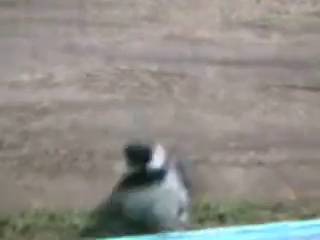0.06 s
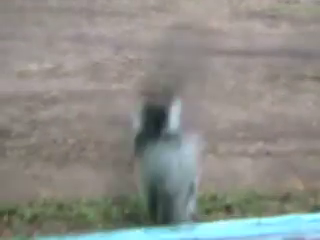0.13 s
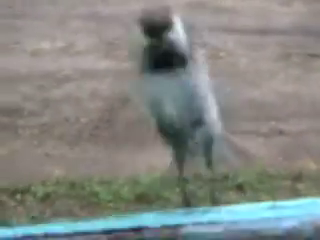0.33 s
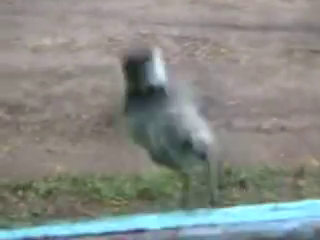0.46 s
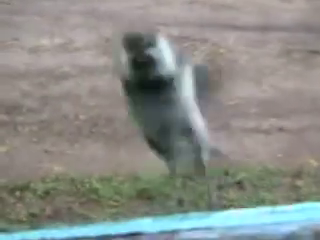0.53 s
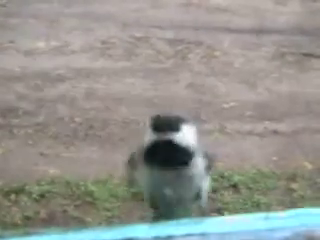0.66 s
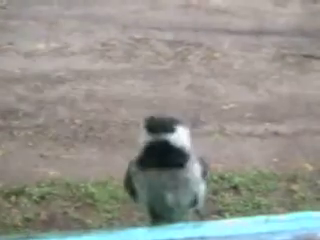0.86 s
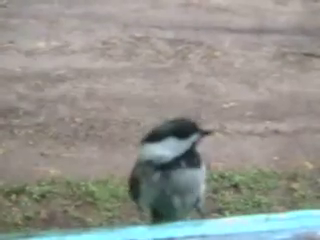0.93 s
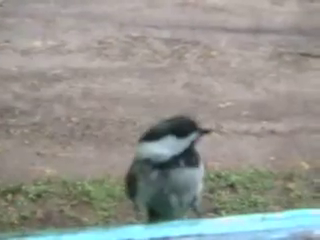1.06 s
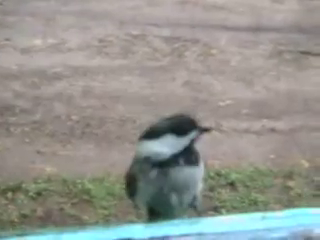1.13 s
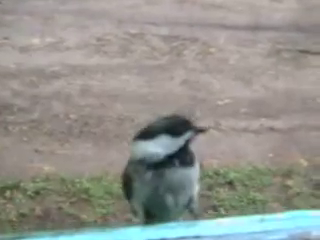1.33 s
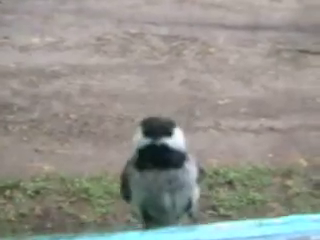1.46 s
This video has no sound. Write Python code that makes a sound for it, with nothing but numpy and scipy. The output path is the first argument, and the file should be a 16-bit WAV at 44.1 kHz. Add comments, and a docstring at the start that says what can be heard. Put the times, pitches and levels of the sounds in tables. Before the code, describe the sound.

Three hard, evenly spaced beak knocks on window glass, with faint claw clicks and soft ticking indoors

```python
"""A small bird strikes a window pane three times with its beak, heard from inside a quiet room.
Each blow is a short push into dying sines (knock and glass), a bright noise burst and a noise tail (room).
Claws click on the sill (noise and a dull thud), a clock ticks faintly (one small ring, repeated),
and far birds chirp (narrow noise), over shaped noise for the room's air and the building's murmur."""
import sys
import numpy as np
from scipy import signal
from scipy.fft import rfft, irfft
from scipy.io import wavfile
from scipy.ndimage import uniform_filter1d

SR = 44100
rng = np.random.default_rng(int(sys.argv[2]) if len(sys.argv) > 2 else 0)


def unload_audio(sound):
    """Save the sound as a 16-bit wav file, at the path given as the first command line argument."""
    columns = np.transpose(np.atleast_2d(sound))
    # keep every value between -1 and 1, then stretch to whole-number steps
    steps = np.round(np.clip(columns, -1, 1) * 32767)
    wavfile.write(sys.argv[1], SR, steps.astype(np.int16))


N = 66150  # 1.5 s


def amp(db):
    """Turn decibels into a plain factor."""
    return 10 ** (np.asarray(db) / 20)


def evened(x):
    """Scale a sound to an rms of 1."""
    return x / np.sqrt(np.mean(x ** 2) + 1e-20)


def read(points, hz):
    """Read a curve at the given pitches, along a logarithmic pitch scale."""
    f, value = np.transpose(points)
    return np.interp(np.log(hz + 1), np.log(f + 1), value)


def level_over_time(points):
    """Draw straight lines between (time, dB) points, one value per sample."""
    return np.interp(np.arange(N) / SR, *np.transpose(points))


def add(mix, s, sound):
    """Mix a sound in at s seconds, cutting off what runs past the end."""
    part = mix[round(s * SR):][:len(sound)]
    part += sound[:len(part)]


def ring(modes, seconds):
    """A struck object sounds as a sum of dying sines, here with a soft start."""
    rise_s = 0.00055
    t = np.arange(round(seconds * SR)) / SR
    tones = 0
    for hz, db, t60 in modes:
        tones = tones + amp(db - 60 * t / t60) * np.sin(2 * np.pi * hz * t)
    return tones * (1 - np.exp(-(t / rise_s) ** 2))


def band_noise(hz, width_hz, size):
    """Noise passed twice through one resonance of the given width, rms 1."""
    b, a = signal.iirpeak(hz, hz / width_hz, SR)
    once = signal.lfilter(b, a, rng.standard_normal(size))
    return evened(signal.lfilter(b, a, once))


def air():
    """Room tone: noise with a fixed colour whose patches of pitch drift in strength."""
    # colour of the room tone: f/Hz, level/dB per Hz
    colour = [(25, -27), (50, -13.5), (90, -7.5), (150, -4), (210, -4), (300, -10), (480, -11.5),
              (620, -4.5), (750, -13.5), (1200, -17.5), (2000, -23.5), (3000, -28.5), (4500, -35),
              (6000, -45.5), (7500, -53.5), (9000, -82)]
    # slow changes of its loudness: t/s, level/dB
    drift = [(0, 5), (.05, -1.5), (0.199, 1), (0.999, -1), (1.25, -2), (1.5, -0.5)]
    base_db = -62.5
    frames, hz = N // 512 + 5, np.fft.rfftfreq(2048, 1 / SR)
    a, b, patches = rng.standard_normal((frames, 1025, 3)).T
    # smooth across pitch, then across time
    patches = evened(uniform_filter1d(uniform_filter1d(patches, 16, 0), 5, 1))
    spectrum = (a + 1j * b) * amp(read(colour, hz)[:, None] + 1.5 * patches)
    noise = signal.istft(spectrum, nperseg=2048, noverlap=1536)[1][:N]
    return amp(base_db + level_over_time(drift)) * evened(noise)


def rumble():
    """Low murmur of the building: narrow low noise, swelling slowly."""
    # loudness of the murmur: t/s, level/dB
    swell = [(0, -78.5), (.9, -73.5), (1.149, -77), (1.33, -70), (1.5, -75)]
    return amp(level_over_time(swell)) * band_noise(37, 25, N)


def far_birds():
    """Blurred short chirps: narrow noise swelling and fading around one pitch."""
    # chirps: t/s, length/s, f/Hz, level/dB
    chirps = [(1.399, .024, 4300, -71), (1.425, .075, 4300, -78), (1.443, 0.021, 4030, -74),
              (1.485, 0.018, 4080, -72)]
    width_hz = 750
    out = np.zeros(N)
    for s, length, hz, db in chirps:
        size = round(length * SR)
        # keep the end of the noise, where the resonance has settled
        noise = band_noise(hz, width_hz, 5000)[-size:]
        add(out, s, amp(db) * np.hanning(size) * noise)
    return out


def clock():
    """The same small ring at each tick, with a little contact noise."""
    # ticks: t/s, level/dB
    ticks = [(0.09, -62.5), (0.19, -59), (.855, -55), (1.024, -56), (1.189, -57), (1.355, -60)]
    # tones of one tick: f/Hz, level/dB, time to fall 60 dB/s
    tick_modes = [(1102, 2.5, 0.091), (1200, -3.5, .05), (890, -1, .05), (1400, -8.5, .03),
                  (2440, -19, .02), (3100, -14, .02)]
    rustle_db, rustle_s = -5, .009
    out, t = np.zeros(N), np.arange(4410) / SR
    for s, db in ticks:
        rustle = amp(rustle_db) * band_noise(1200, 1200, len(t)) * np.exp(-t / rustle_s)
        add(out, s, amp(db) * (ring(tick_modes, .1) + rustle))
    return out


def claws():
    """Each click is a bright noise scratch and a small dull thud; one soft low thump joins them."""
    # clicks: t/s, scratch level/dB, thud level/dB
    clicks = [(.1146, -68.5, -45), (.173, -72.5, -46.5), (0.218, -57, -45.5), (.3576, -58.5, -55),
              (.5367, -59, -53), (0.69, -51.5, -53), (.722, -65, -55), (0.8309, -63, -57)]
    # the single thump: t/s, level/dB, f/Hz
    thump = (.058, -54, 170)
    scratch_hz, scratch_width_hz, scratch_s = 4300, 3400, .005
    thud_hz, thud_t60 = 600, .014
    out, t = np.zeros(N), np.arange(1500) / SR
    for s, treble_db, thud_db in clicks:
        scratch = band_noise(scratch_hz, scratch_width_hz, len(t)) * np.exp(-t / scratch_s)
        thud = ring([(thud_hz, thud_db, thud_t60)], len(t) / SR)
        add(out, s, amp(treble_db) * scratch + thud)
    s, db, hz = thump
    one_cycle = np.sin(2 * np.pi * np.arange(0, 1 / hz, 1 / SR) * hz)
    add(out, s, -amp(db) * one_cycle)
    return out


def near_walls(x):
    """Near walls add a short blur after small sounds: a quickly dying noise tail."""
    blur_db, blur_t60 = -15.5, 0.05
    tail = rng.standard_normal(3000) * amp(-60 * np.arange(3000) / SR / blur_t60)
    return x + amp(blur_db) * signal.fftconvolve(x, tail / np.linalg.norm(tail))[:N]


def room():
    """Dense tail of the room: coloured noise, each band dying at its own speed."""
    # how long the room rings: f/Hz, time to fall 60 dB/s
    band_t60 = [(100, 0.76), (300, 0.42), (560, 0.2), (1400, 0.21), (2800, 0.2), (3800, 0.21), (5000, 0.24),
                (6500, .28)]
    # colour of the tail: f/Hz, level/dB per Hz
    colour = [(60, -35), (150, -16.5), (300, -7), (460, -5), (700, 2), (1000, -1.5), (1450, -7.5),
              (2000, -5), (2600, -12), (3500, -24.5), (4700, -27), (5400, -29), (6200, -33.5), (7000, -40),
              (9000, -70.5)]
    level_db, rise_s = -19, .003
    late_db, late_t60 = -15, 0.64  # slower tail from the far end of the house
    hz, t, z = signal.stft(rng.standard_normal(SR), SR, nperseg=512)
    early = amp(-60 * t / read(band_t60, hz)[:, None])
    fading = early + amp(late_db - 60 * t / late_t60)
    tail = signal.istft(z * amp(read(colour, hz))[:, None] * fading, SR, nperseg=512)[1][:SR]
    tail = tail * (1 - np.exp(-np.arange(SR) / SR / rise_s))
    # set the level by the first 50 ms
    return amp(level_db) * tail / np.sqrt(np.mean(tail[:2205] ** 2))


def crack():
    """Bright burst of the many high modes of the glass, made from quickly dying noise."""
    # colour of the burst: f/Hz, level/dB per Hz
    colour = [(800, -31.5), (2000, -6), (2700, 1.5), (3500, -7.5), (4700, -9.5), (6000, -18), (7000, -19.5),
              (9000, -45.5)]
    level_db, t60, rise_s = -14, .042, .0005
    spectrum = rfft(rng.standard_normal(SR))
    burst = irfft(spectrum * amp(read(colour, np.fft.rfftfreq(SR, 1 / SR))))
    t = np.arange(SR) / SR
    return amp(level_db - 60 * t / t60) * evened(burst) * (1 - np.exp(-t / rise_s))


def window():
    """Each blow pushes the same knock, pane and room, with fresh noise in its burst and part of its tail."""
    # beak blows, each its own: t/s, strength/dB, contact/ms
    blows = [(.2218, -3.5, 0.27), (.3891, -3, 0.29), (.5624, -1, 0.26)]
    # short knock of the struck spot: f/Hz, level/dB, time to fall 60 dB/s
    knock_modes = [(317.6, -8.5, 0.023), (571, -2.5, 0.11), (932, -3, 0.018), (1397, -12.5, 0.069),
                   (1985, -10, 0.029), (2425, -14, 0.035)]
    # ringing pane: f/Hz, level/dB, time to fall 60 dB/s
    pane_modes = [(117.9, -34, .5), (147.5, -33, 0.58), (218.4, -33.5, 0.7), (283.7, -33.5, 0.59),
                  (330.3, -29.5, 0.23), (390.8, -25, 0.42), (469, -24.5, 0.32), (566.3, -6.5, 0.2),
                  (604, -20, 0.24), (658.5, -17, 0.14), (684, -15, 0.2), (791.5, -27.5, .27),
                  (861.3, -18, 0.33), (966.5, -17.5, 0.15), (1119, -29, 0.49), (1206, -25.5, .23),
                  (1378, -24, 0.065)]
    # echoes of the knock: delay/s, level/dB
    echoes = [(.0020, -4.5), (.0045, -4), (.0075, -8), (.0248, -12.5)]
    first_db, first_s = 4, .008  # the first swings of the glass are stronger
    fresh_share = .35  # extra room tail, new at each blow
    pane_low_hz = 105
    out = np.zeros(N)
    reply = room() - ring(pane_modes, 1)
    knock = ring(knock_modes, .1)
    for delay, db in [(0.0011, 0)] + echoes:  # the knock itself, then its echoes
        add(reply, delay, -amp(db) * knock)
    reply = reply * amp(first_db * np.exp(-np.arange(SR) / SR / first_s))
    for s, db, contact_ms in blows:
        u = np.arange(200) / SR / (contact_ms / 4000)  # time in quarters of the contact
        shape = u * np.exp(-u)
        push = amp(db) * shape / np.sum(shape)
        add(out, s, signal.fftconvolve(push, reply + crack() + fresh_share * room()))
    return signal.sosfilt(signal.butter(2, pane_low_hz, "high", fs=SR, output="sos"), out)


def scene():
    """Mix the quiet background, the window and the small sounds with their blur."""
    small_sounds = near_walls(claws() + clock() + far_birds())
    return (air() + rumble() + window() + small_sounds)[None]


def record(dry):
    """Overload at the peaks, a dull recording channel, band limit, faint hiss."""
    ceiling, edge_hz, hiss_db = .708, 8400, -102
    held = dry / (1 + (dry / ceiling) ** 20) ** (1 / 20)
    dull = signal.sosfilt(signal.butter(8, 6500, fs=SR, output="sos"), held)
    band_limit = signal.firwin(255, edge_hz, window=("kaiser", 8), fs=SR)
    cut = signal.oaconvolve(dull, band_limit[None], "same")
    return cut + amp(hiss_db) * rng.standard_normal(dry.shape)


dry = scene()
out = record(dry)
unload_audio(out)
```